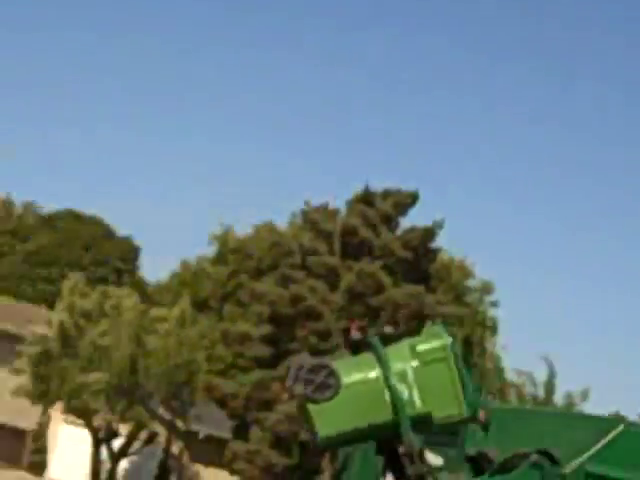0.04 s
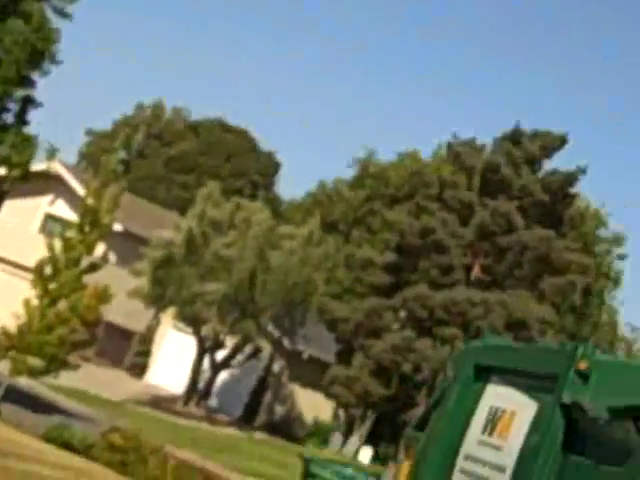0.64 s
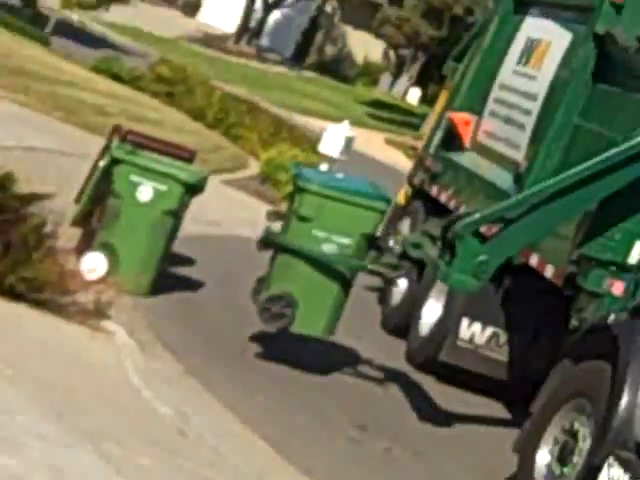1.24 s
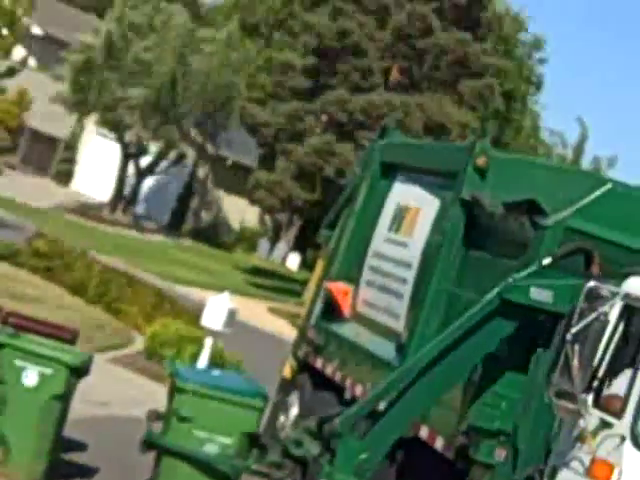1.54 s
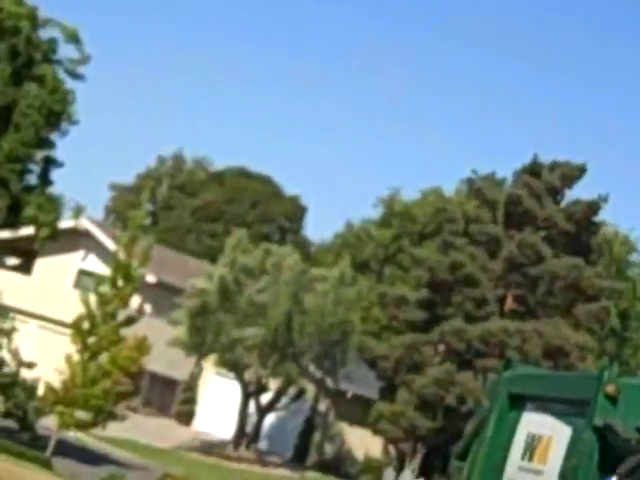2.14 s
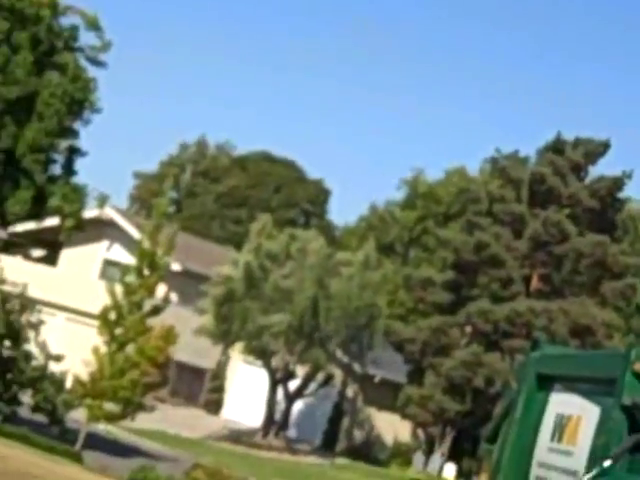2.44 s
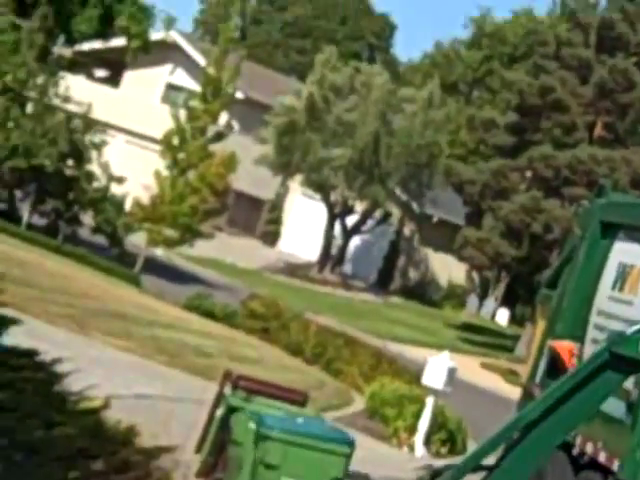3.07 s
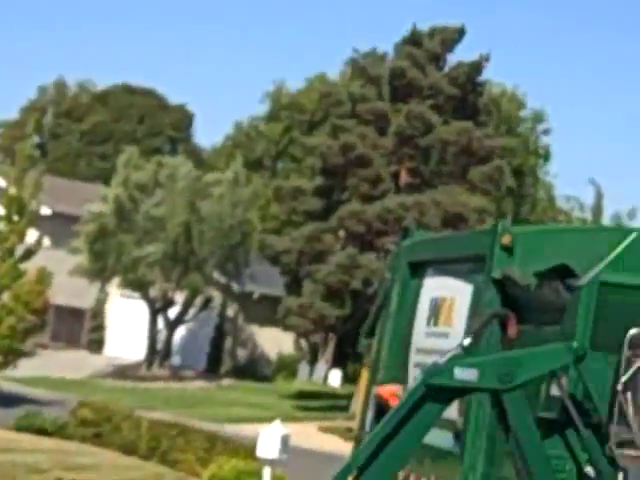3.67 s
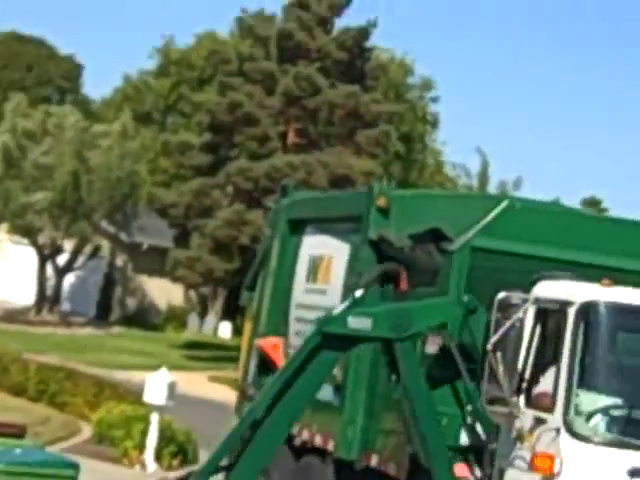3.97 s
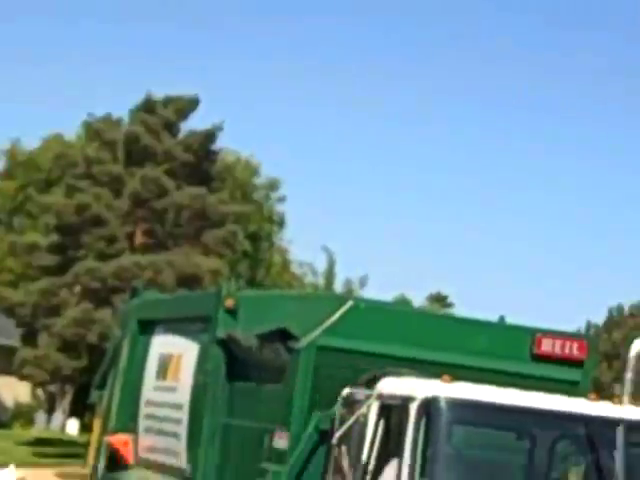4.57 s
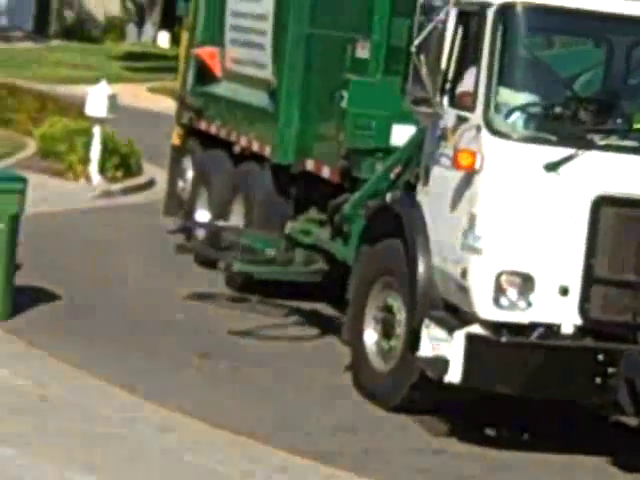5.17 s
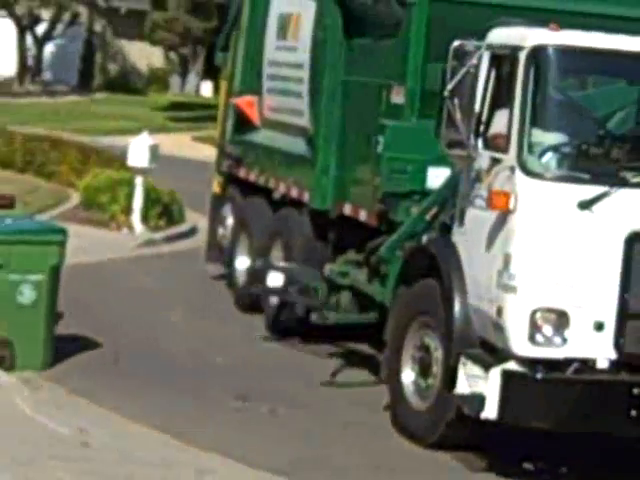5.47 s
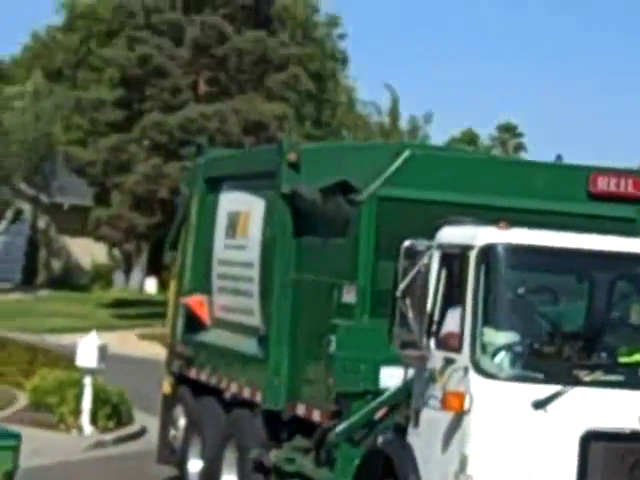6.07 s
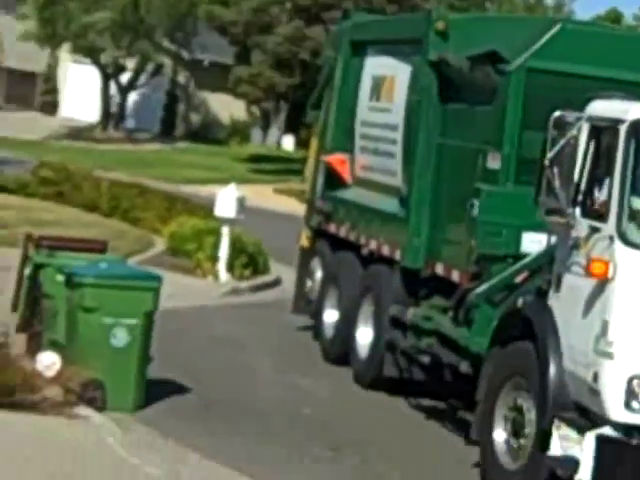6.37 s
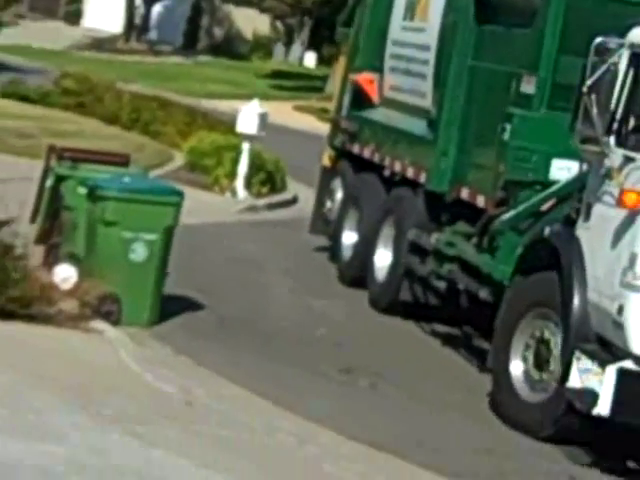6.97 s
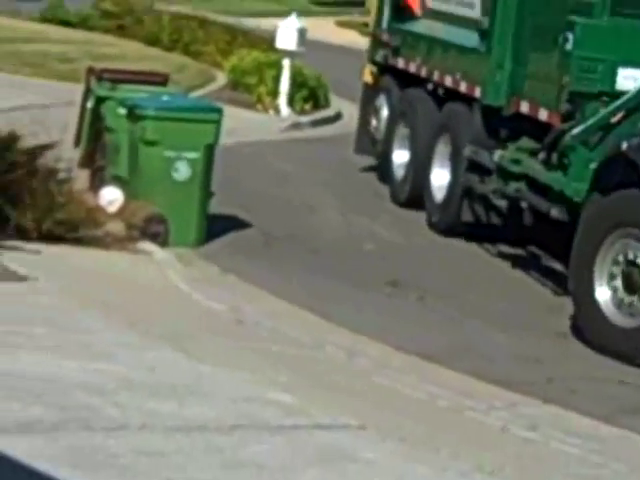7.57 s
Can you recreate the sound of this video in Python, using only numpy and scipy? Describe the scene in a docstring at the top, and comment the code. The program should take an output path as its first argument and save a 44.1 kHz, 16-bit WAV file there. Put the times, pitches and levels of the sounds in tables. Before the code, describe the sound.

Hydraulic hiss and a fine metallic shimmer ride over the rough idle of a refuse truck in the street. Its lifting arm clanks repeatedly while lowering an empty wheelie bin, which lands with a hollow thump and a few smaller knocks. After a steadier stretch of engine clatter, the arm latches with a quick run of steel clinks, and the diesel revs up, growing louder.

```python
"""Refuse truck lowering a cart

A diesel clatters in a residential street while oil hisses through the valves of the truck's arm.
The clatter swells in short rough surges under a metallic shimmer; a thin high hiss comes and goes.
The hollow wheelie cart bumps onto the road and rocks, the arm folds against its latch,
and at the end the engine picks up."""
import sys
import numpy as np
from scipy import signal
from scipy.fft import rfft, irfft, next_fast_len
from scipy.io import wavfile

SR = 44100
rng = np.random.default_rng(int(sys.argv[2]) if len(sys.argv) > 2 else 0)


def output_pcm(signal):
    """Save a mono or channel-first signal as 16-bit PCM at the path in sys.argv[1].

    Samples are clipped to [-1, 1] before scaling.
    """
    pcm = np.clip(np.atleast_2d(signal).T, -1, 1) * 32767
    wavfile.write(sys.argv[1], SR, np.round(pcm).astype(np.int16))


N = 344862
TIME = np.arange(N) / SR

# Engine speed. Each row: time in seconds, firings per second.
ENGINE_SPEED = [(0, 35.9), (1.2, 35.6), (2.8, 35.1), (3.7, 36.8), (4.5, 34.6), (5.4, 36.3), (6.3, 34.6),
                (6.9, 39.5), (7.3, 42.0), (7.82, 45.0)]
# Engine load, heard as clatter, and oil flow, heard as hiss. Each row: time in seconds, level in dB.
ENGINE_LOAD = [(0.0, -28.5), (0.85, -30.5), (1.15, -29), (2.77, -30.5), (3.01, -28), (3.55, -30),
               (4.29, -30), (4.62, -31), (6.23, -30), (6.93, -34.5), (7.02, -29), (7.27, -25.5),
               (7.82, -25)]
OIL_FLOW = [(0.0, -33), (0.37, -36.5), (1.0, -33.5), (2.7, -33), (2.94, -33), (3.5, -31.5), (4.6, -35),
            (5.55, -35), (6.75, -33.5), (7.1, -37.5), (7.32, -32), (7.82, -27.5)]

# EQ curves that colour each layer. Each row: frequency in Hz, relative level in dB.
EXHAUST_EQ = [(90, -18), (140, -19.5), (185, -7.5), (240, 7.5), (320, 1), (420, 11.5), (600, 16),
              (1000, -26.5)]
PANEL_EQ = [(140, -35), (200, -5), (255, 1.5), (360, 2.5), (480, 6.5), (580, 5), (800, -17)]
COVER_EQ = [(300, -21), (500, 1), (800, -5.5), (1400, 3), (2500, 2.5), (3500, -10)]
CLATTER_EQ = [(250, -55), (420, -5.5), (550, -5), (700, -2), (1050, -0.5), (1200, -2), (1500, -1),
              (1800, -3), (2600, 0), (3500, -6.5), (5000, -62.5)]
OIL_EQ = [(1800, -21), (2800, -14.5), (3500, 2.5), (4400, 3), (5000, -11.5), (5450, 2), (6200, -26),
          (6500, -13.5), (8500, -22), (10000, -79.5)]
THIN_HISS_EQ = [(5000, -39), (6400, 11), (6700, 13.5), (7200, 16), (7500, -29), (8500, -40), (8850, 4.5),
                (9500, -10.5), (10000, -43)]
FLUTTER_EQ = [(15, 26), (35, -9), (60, -12), (120, -31), (300, -29)]
STREET_EQ = [(20, 9), (60, 9.5), (130, 6.5), (300, -3.5), (1000, -16)]
SURGE_EQ = [(100, -33), (170, -33), (300, 1.5), (700, -2.5), (1450, -17.5), (1900, -17), (4000, 3.5),
            (4900, 2), (5450, -9), (6100, -18), (6500, -5.5), (8500, -22), (10000, -32.5)]
CRACK_EQ = [(150, -17), (300, -1), (800, -3), (1500, -5.5), (3000, -6), (4800, -20), (6500, -9)]

# Resonances of the engine block, oil valves, exhaust pipe and revving engine.
# Each row: pitch in Hz, width in Hz, relative level in dB.
BLOCK_RESONANCES = [(668, 30, -3), (783, 16, -4), (980, 24, -1), (1385, 50, -4), (1470, 60, -1)]
VALVE_RESONANCES = [(4950, 170, 1), (5830, 110, 3), (5975, 55, 4)]
PIPE_RESONANCE = [(214, 80, 0)]
ROAR_RESONANCES = [(673, 16, -1), (994, 35, 3.5), (1466, 97, 2.5), (2106, 160, 3.5), (2520, 37, -2)]
# Steady tones of the engine block. Each row: pitch in Hz, level in dB.
BLOCK_TONES = [(785, -51), (985, -54)]
# Modes of the hollow cart and truck body, and of the steel latch.
# Each row: pitch in Hz, relative level in dB, seconds to fade by 60 dB.
BODY_MODES = [(187, -22, 0.075), (318, -9, 0.1), (441, -9, 0.14), (591, -1, 0.2), (680, -4, .08),
              (764, -1, 0.11), (867, -3, .11), (921, -3, .08), (1034, -5, .08), (1217, -4, 0.09),
              (1362, -2, 0.08)]
LATCH_MODES = [(2560, -8, .12), (3480, -8, .16), (3780, -7, 0.14), (4880, -3, 0.08), (5010, -3, 0.1),
               (5800, -11.5, 0.066), (5975, -5, 0.096)]

# Bursts of thin high hiss, rough surges of the clatter, and brighter glints in the shimmer.
# Each row: start in seconds, length in seconds, level in dB.
HISS_BURSTS = [(0, 0.11, -42.5), (0.279, 0.058, -44), (0.535, 0.29, -46.5), (1.523, 0.084, -42.5),
               (2.114, 0.063, -40), (5.027, 0.13, -45.5), (5.555, 0.024, -37), (6.633, 0.18, -37.5),
               (7.131, 0.21, -39)]
CLATTER_SURGES = [(0.097, 0.039, -27.5), (0.145, 0.023, -28), (0.3, 0.025, -30.5), (0.702, 0.036, -28),
                  (0.77, 0.033, -27), (0.903, 0.064, -27), (0.995, 0.039, -30), (1.092, 0.086, -28),
                  (1.272, 0.053, -29), (1.348, 0.056, -27), (1.437, 0.038, -27.5), (1.547, 0.056, -29.5),
                  (1.77, 0.02, -27.5), (1.859, 0.061, -26), (1.991, 0.032, -29), (2.059, 0.022, -29.5),
                  (2.119, 0.061, -29), (2.466, 0.036, -27), (2.863, 0.022, -25), (2.923, 0.042, -26.5),
                  (3.237, 0.056, -26.5), (4.074, 0.035, -31.5), (4.323, 0.073, -30.5),
                  (4.452, 0.049, -30.5), (4.514, 0.044, -29.5), (5.12, 0.07, -28.5), (5.403, 0.049, -30),
                  (5.476, 0.034, -30.5), (5.552, 0.06, -30.5), (5.753, 0.064, -33), (5.955, 0.072, -29),
                  (6.081, 0.054, -28.5), (6.217, 0.048, -29), (6.315, 0.024, -29), (6.495, 0.083, -27.5),
                  (6.979, 0.03, -30), (7.139, 0.14, -28.5), (7.263, 0.06, -25.5), (7.402, 0.026, -25.5),
                  (7.49, 0.034, -23), (7.593, 0.022, -26)]
GLINTS = [(.385, 0.091, -35.5), (1.635, 0.022, -36), (2.403, 0.028, -31.5), (2.785, 0.023, -30.5),
          (3.085, 0.056, -31.5), (3.39, 0.056, -41), (3.51, 0.084, -36.5), (3.6, 0.054, -36),
          (3.67, 0.07, -35.5), (3.807, 0.066, -32.5), (3.895, 0.044, -36), (3.997, 0.033, -29),
          (4.068, 0.039, -30.5), (4.18, 0.025, -31.5), (4.28, 0.038, -35), (4.65, 0.045, -45),
          (4.75, 0.058, -41), (4.867, 0.043, -30), (4.945, 0.033, -35.5), (5.28, 0.024, -34.5),
          (5.63, 0.028, -29.5), (6.59, 0.098, -36)]
# Hard metal-on-metal hits. Each row: start in seconds, level in dB.
ARM_CLANKS = [(0.105, -29), (0.296, -25.5), (0.434, -25.5), (0.707, -30), (0.996, -26), (1.133, -27),
              (1.385, -25), (1.442, -25), (1.464, -22.5), (1.552, -26), (1.775, -26.5), (1.787, -27),
              (2.004, -27.5), (2.06, -24.5), (2.174, -28), (2.404, -25), (2.47, -27), (3.262, -30),
              (5.483, -25), (5.567, -25), (5.59, -24), (5.7, -24), (5.803, -31), (6.319, -25), (6.998, -27),
              (7.1, -34), (7.404, -26), (7.512, -21), (7.607, -24)]
# Knocks of cart and arm; the cart lands and rocks from 2.86 s.
# Each row: start in seconds, level in dB, pitch of the booming wall in Hz.
HOLLOW_KNOCKS = [(0.112, -27.5, 260), (0.934, -30, 172), (1.457, -26, 236), (1.555, -34, 154),
                 (2.124, -32, 141), (2.855, -14.5, 190), (2.917, -21, 181), (2.949, -23, 162),
                 (3.008, -22.5, 161), (3.145, -30, 151), (3.377, -29, 140), (3.529, -29, 173),
                 (4.363, -36, 178), (5.468, -37, 170), (5.548, -38.5, 185), (5.789, -26, 225)]
# The cart's plastic sides on landing. Each row: start in seconds, pitch in Hz, peak level in dB.
SIDE_RINGS = [(2.854, 630, -20.5), (2.854, 810, -18), (2.858, 325, -26), (2.872, 920, -26),
              (2.909, 172, -31), (2.943, 175, -27.5), (3.005, 771, -21), (3.022, 175, -35)]
# Squeals of the arm's pivots. Each row: start in seconds, length in seconds, pitch in Hz, level in dB.
PIVOT_SQUEALS = [(2.956, 0.025, 4240, -31), (4.456, 0.027, 4200, -31), (7.224, 0.098, 4600, -26),
                 (7.696, 0.021, 4300, -26)]
# The folding arm strikes and scrapes its latch.
# Each row: start in seconds, length in seconds, level in dB, pitch in Hz below which modes ring.
LATCH_HITS = [(5.476, .03, -30, 5300), (5.587, 0.017, -28, 6500), (5.698, .03, -30, 6500),
              (5.735, .03, -32, 6500), (5.796, .025, -29, 5300)]


def from_db(db):
    """Decibels to gain."""
    return 10 ** (np.asarray(db) / 20)


def unit_power(x):
    """Scale to an RMS of one."""
    return x / np.sqrt(np.mean(x ** 2) + 1e-20)


def curve(rows):
    """Glide through (seconds, value) points, sample by sample."""
    return np.interp(TIME, *np.transpose(rows))


def white():
    """Fresh white noise."""
    return rng.standard_normal(N)


def butter(x, order, hz, kind):
    """Low-, high- or band-pass filter."""
    return signal.sosfilt(signal.butter(order, hz, kind, fs=SR, output="sos"), x)


def colour(x, eq):
    """Shape a sound with an EQ curve, rolling off past its ends; unit power."""
    size = next_fast_len(N)
    hz, level_db = np.transpose(eq)
    bin_hz = np.arange(size // 2 + 1) * SR / size + 1
    gain = from_db(np.interp(np.log(bin_hz), np.log(hz), level_db))
    skirts = np.minimum(1, bin_hz / hz[0]) ** 2 * np.minimum(1, hz[-1] / bin_hz) ** 2
    return unit_power(irfft(rfft(x, size) * gain * skirts, size)[:N])


def resonate(x, resonances):
    """Parallel resonances driven by one signal; unit power."""
    out = 0
    for hz, width_hz, db in resonances:
        r = np.exp(-np.pi * width_hz / SR)
        poles = [1, -2 * r * np.cos(2 * np.pi * hz / SR), r * r]
        out += from_db(db) * signal.lfilter([1 - r, 0, r - 1], poles, x)
    return unit_power(out)


def ring(drive, hz, t60):
    """One mode: a unit click sets off a sine of height 1 that fades 60 dB in t60 seconds."""
    r, w = np.exp(-np.log(1000) / (t60 * SR)), 2 * np.pi * hz / SR
    return signal.lfilter([0, np.sin(w)], [1, -2 * r * np.cos(w), r * r], drive + 1e-18)


def gate(rows, edge_s):
    """A soft-edged gain that opens for each (start, length, dB) row."""
    gain = np.zeros(N)
    for s, length, db in rows:
        near = slice(max(0, int((s - edge_s) * SR)), int((s + length + edge_s) * SR))
        inside_s = np.minimum(TIME[near] - s, s + length - TIME[near])
        gain[near] += from_db(db) * np.clip(inside_s / edge_s + .5, 0, 1)
    return gain


def flicker(per_s, depth_db):
    """A gain that wanders at random: it may sag far, but its swells are capped."""
    steps = np.minimum(rng.standard_normal(4000), .9)
    return from_db(depth_db * np.interp(TIME * per_s, np.arange(len(steps)), steps))


def jangle(low_hz, high_hz, per_s, t60, spread_db, count):
    """Random taps on loose parts, each ringing at its own pitch; unit power."""
    taps = (rng.random(N) < per_s / SR) * rng.choice([-1, 1], N) * from_db(spread_db * white())
    part = rng.integers(0, count, N)
    detune = rng.uniform(-.3, .3, count) * np.log(high_hz / low_hz) / count
    pitches = np.geomspace(low_hz, high_hz, count) * (1 + detune)
    return unit_power(sum(ring(taps * (part == k), hz, t60) for k, hz in enumerate(pitches)))


def clangs(rows, low_hz, high_hz, t60, taps_per_s, strike_db, count, spread_s=.008, settle_t60=.07):
    """Each (start, length, dB) row strikes a fresh set of metallic tones, which chatter on and ring."""
    out = np.zeros(N + SR)
    age = TIME[:SR // 5]
    shape = (count, len(age))
    for s, length, db in rows:
        taps = (rng.random(shape) < taps_per_s / SR) * (age < length) * rng.choice([-1., 1.], shape)
        strike_at = rng.integers(0, int(spread_s * SR), count)
        taps[np.arange(count), strike_at] += from_db(strike_db) * rng.standard_normal(count)
        pitches = low_hz + (high_hz - low_hz) * (np.arange(count) + rng.random(count)) / count
        tones = sum(ring(drive, hz, t60) for drive, hz in zip(taps, pitches))
        # Once the chatter ends, the ring is choked.
        tones *= from_db(-60 * np.maximum(age - length, 0) / settle_t60)
        rms = np.sqrt(np.sum(tones ** 2) / (length * SR))
        start = int(s * SR)
        out[start:start + len(age)] += from_db(db) * tones / rms
    return butter(out[:N], 3, [low_hz / 2, 6500], "band")


def firing(decay_strokes, depth, uneven_db):
    """The engine's pulse: six cylinders knock in turn, each with its own strength, and die away."""
    phase = np.cumsum(curve(ENGINE_SPEED)) / SR
    stroke = phase.astype(int)
    unevenness = rng.standard_normal(6)[stroke % 6] + rng.standard_normal(1000)[stroke]
    decay = np.exp(-(phase % 1) / decay_strokes)
    return unit_power(1 + depth * from_db(uneven_db * unevenness) * decay)


def engine(beat, load_db):
    """Firings puff through the exhaust and rattle the tin covers; the panels drum and the block drones."""
    exhaust = from_db(-20) * colour(beat * white(), EXHAUST_EQ)
    drumming = jangle(low_hz=215, high_hz=560, per_s=62, t60=.13, spread_db=2, count=14)
    panels = from_db(-2.27) * colour(drumming, PANEL_EQ)
    tin = jangle(low_hz=612.7, high_hz=2501, per_s=340, t60=.14, spread_db=1, count=40)
    covers = from_db(-6) * colour(beat * tin, COVER_EQ)
    clatter = from_db(-3) * colour(beat * white(), CLATTER_EQ)
    drone = from_db(-42) * resonate(colour(white(), [(400, 0), (2500, 0)]), BLOCK_RESONANCES)
    idle_load_db = -28.5
    exhaust_db = -42 + .1 * (load_db - idle_load_db)
    return from_db(exhaust_db) * (exhaust + panels) + from_db(load_db) * (clatter + covers) + drone


def hydraulics(oil_db, accents):
    """Oil hisses through the valves, whose narrow ports sing in bursts, louder on the accents."""
    hiss = from_db(oil_db - 11) * colour(white(), OIL_EQ)
    ports = sum(from_db(db) * resonate(white(), [(hz, width, 0)]) * flicker(per_s=27, depth_db=11)
                for hz, width, db in VALVE_RESONANCES)
    singing = butter(unit_power(ports), 12, 6080, "low")
    return hiss + (from_db(oil_db - 12) + from_db(-15) * accents) * singing


def block_hum():
    """Two steady tones of the engine block hum faintly, unsteady in pitch and strength."""
    out = 0
    for hz, db in BLOCK_TONES:
        wander = 1 + .005 * np.interp(TIME * 10, np.arange(100), rng.standard_normal(100))
        tone = np.sqrt(2) * np.sin(2 * np.pi * hz * np.cumsum(wander) / SR)
        out += from_db(db) * tone * flicker(per_s=8, depth_db=4)
    return out


def shimmer(oil_db, grains_per_s, grain_s, spread_db):
    """A fine, flickering metallic shimmer in the treble rides the oil hiss, with brighter glints."""
    count = int(grains_per_s * TIME[-1])
    starts = (np.arange(count) + rng.random(count)) / grains_per_s
    levels = np.interp(starts, TIME, oil_db) + spread_db * rng.standard_normal(count)
    grains = [(s, grain_s, db) for s, db in zip(starts, levels)]
    sheen = clangs(grains, low_hz=2400, high_hz=4900, t60=.12, taps_per_s=90, strike_db=-1, count=8)
    glints = clangs(GLINTS, low_hz=2900, high_hz=5500, t60=.13, taps_per_s=90, strike_db=-2, count=9)
    return from_db(-3.5) * sheen + from_db(.1) * glints


def thin_hiss(long_burst_s):
    """A thin high hiss comes and goes, with low flutter under the longer bursts."""
    hiss = gate(HISS_BURSTS, edge_s=.0028) * colour(white(), THIN_HISS_EQ)
    hiss *= flicker(per_s=25, depth_db=12)
    long_bursts = [(s, length, db) for s, length, db in HISS_BURSTS if length > long_burst_s]
    flutter = gate(long_bursts, edge_s=.06) * colour(white(), FLUTTER_EQ)
    return hiss + from_db(-7) * flutter


def street_bed():
    """The street's faint, murky noise floor."""
    return from_db(-66.5) * colour(white(), STREET_EQ)


def clatter_surges(surging):
    """The clatter swells in short rough surges of dense clicks, with a metallic ring on top."""
    grains = white() * from_db(1.5 * white())
    clicks = surging * colour(grains, SURGE_EQ)
    mids = clangs(CLATTER_SURGES, low_hz=600, high_hz=2300, t60=.09, taps_per_s=100, strike_db=0, count=10)
    top = clangs(CLATTER_SURGES, low_hz=2300, high_hz=4750, t60=.14, taps_per_s=90, strike_db=1, count=8)
    return from_db(-8.5) * clicks + from_db(-2) * mids + from_db(-1) * top


def clanks(stroke_s):
    """Slack in the arm is taken up with one hard stroke that rings briefly over a wide range."""
    strokes = [(s, stroke_s, db) for s, db in ARM_CLANKS]
    return clangs(strokes, low_hz=550, high_hz=4700, t60=.14, taps_per_s=30, strike_db=6,
                  count=20, spread_s=.005)


def knocks(contact_s, crack_t60, crack_db, ring_db):
    """Each blow is a brief chatter of contacts that rings the hollow body and throws out a dull crack."""
    blows, crack = np.zeros(N), np.zeros(N)
    for s, db, _ in HOLLOW_KNOCKS:
        start = int(s * SR)
        age = TIME[:min(N - start, SR)]
        blows[start:start + len(age)] += from_db(db) * np.exp(-age / contact_s)
        crack[start:start + len(age)] += from_db(db + crack_db - 60 * age / crack_t60)
    chatter = blows * white() / np.sqrt(contact_s * SR)
    hollow = sum(from_db(db + ring_db) * ring(chatter, hz, t60) for hz, db, t60 in BODY_MODES)
    crack *= colour(white(), CRACK_EQ)
    return butter(hollow + crack, 6, [130, 5000], "band")


def boom(s, hz, db, rise_s):
    """A low ring that takes a moment to swing up, then dies away."""
    out, start = np.zeros(N), int(s * SR)
    age = TIME[:min(N - start, SR // 2)]
    swing = from_db(db) * age / rise_s * np.exp(1 - age / rise_s)
    out[start:start + len(age)] = swing * np.sin(2 * np.pi * (hz * age + rng.random()))
    return out


def low_booms(rise_s, limit_db):
    """Every knock booms a wall, up to a limit, and a soft boom sits under each surge of the clatter."""
    walls = sum(boom(s, hz, min(db - 8, limit_db), rise_s) for s, db, hz in HOLLOW_KNOCKS)
    under_surges = sum(boom(s + length / 2, hz=rng.uniform(170, 237), db=db - 20.5, rise_s=rise_s)
                       for s, length, db in CLATTER_SURGES)
    return butter(walls + under_surges, 6, 125, "high")


def scatter(x, t60, wet_db):
    """The truck's side, hedges and walls scatter a short tail."""
    age = TIME[:SR // 2]
    tail = rng.standard_normal(len(age)) * from_db(-60 * age / t60)
    tail /= np.sqrt(np.sum(tail ** 2))
    return x + from_db(wet_db) * signal.fftconvolve(x, tail)[:N]


def street_echo(x, delay_s, echo_db):
    """A house front sends back one dull slap."""
    dull = butter(x, 2, 3000, "low")
    return x + from_db(echo_db) * np.interp(TIME - delay_s, TIME, dull, left=0)


def cart_sides(rise_s):
    """The cart's plastic sides ring hollowly as it lands and rocks."""
    rings = sum(boom(s, hz, db, rise_s) for s, hz, db in SIDE_RINGS)
    return butter(rings, 4, 135, "high")


def squeals(width_hz):
    """A dry pivot squeals briefly in one narrow band."""
    out = 0
    for s, length, hz, db in PIVOT_SQUEALS:
        band = [(hz, width_hz, 0)]
        out += gate([(s, length, db)], edge_s=.016) * resonate(resonate(white(), band), band)
    return out


def latch():
    """Steel chatters on steel, ringing the latch's modes; only the brighter hits reach the top ones."""
    out = 0
    for hz, db, t60 in LATCH_MODES:
        hits = [hit for *hit, top_hz in LATCH_HITS if hz < top_hz]
        contact = gate(hits, edge_s=.004) * white()
        even_power = np.sqrt(4 * np.log(1000) / (t60 * SR))  # a long ring builds up no louder
        out += from_db(db) * even_power * ring(contact, hz, t60)
    return butter(out, 6, [2500, 6200], "band")


def revving(beat, load_db, full_load_db, full_firings_per_s):
    """Load rouses a rough, low resonance of the exhaust pipe; near full speed the engine roars."""
    pipe = resonate(resonate(beat * white(), PIPE_RESONANCE), PIPE_RESONANCE)
    pipe_db = -39.5 + 3.9 * (load_db - full_load_db)
    roar = resonate(colour(beat * white(), [(600, 0), (2600, 0)]), ROAR_RESONANCES)
    roar_db = -34.5 + 1.9 * np.minimum(curve(ENGINE_SPEED) - full_firings_per_s, 0)
    return from_db(pipe_db) * pipe + from_db(roar_db) * roar


def scene():
    """Truck, cart and street in mono; only the knocks and the cart's sides get the street's echoes."""
    load_db = curve(ENGINE_LOAD)
    oil_db = curve(OIL_FLOW) + 3.5 + 20 * np.log10(flicker(per_s=6.9, depth_db=1.94))
    beat = firing(decay_strokes=.3, depth=.75, uneven_db=2.2)
    surging = gate(CLATTER_SURGES, edge_s=.0031)
    truck = engine(beat, load_db) + revving(beat, load_db, full_load_db=-24, full_firings_per_s=40.1)
    truck += clatter_surges(surging) + clanks(stroke_s=.009) + block_hum()
    truck += low_booms(rise_s=.0062, limit_db=-33)
    treble = hydraulics(oil_db, accents=surging + gate(GLINTS, edge_s=.01))
    treble += shimmer(oil_db, grains_per_s=21, grain_s=.04, spread_db=1.2)
    treble += squeals(width_hz=240) + latch()
    cart = knocks(contact_s=.006, crack_t60=.21, crack_db=-1, ring_db=-9) + cart_sides(rise_s=.0065)
    cart = street_echo(scatter(cart, t60=.4, wet_db=-10), delay_s=.068, echo_db=-13)
    return (truck + treble + cart + thin_hiss(long_burst_s=.14) + street_bed())[None]


def record(dry):
    """A steep high cut at 10150 Hz."""
    return signal.sosfilt(signal.ellip(12, .1, 95, 10150, fs=SR, output="sos"), dry)


dry = scene()
out = record(dry)
output_pcm(out)
```